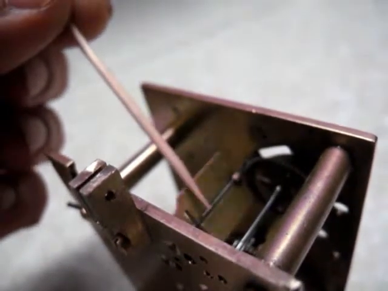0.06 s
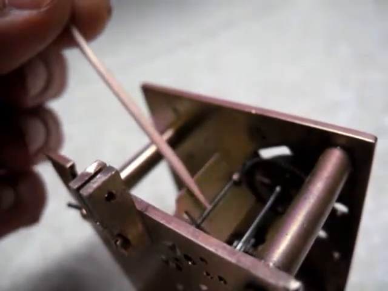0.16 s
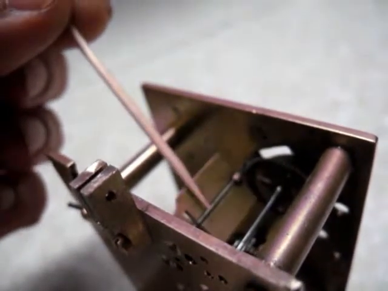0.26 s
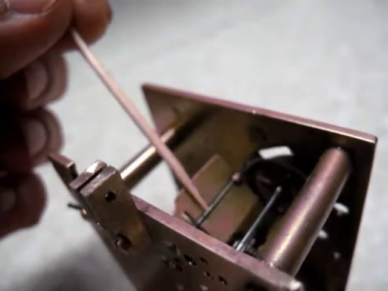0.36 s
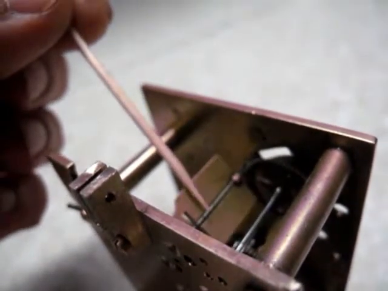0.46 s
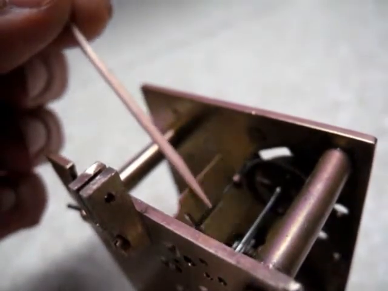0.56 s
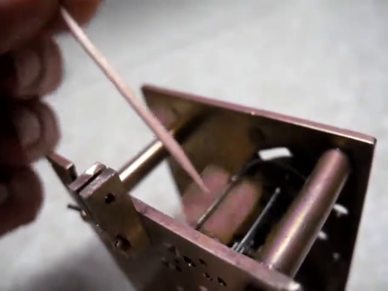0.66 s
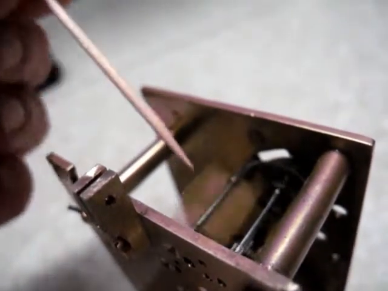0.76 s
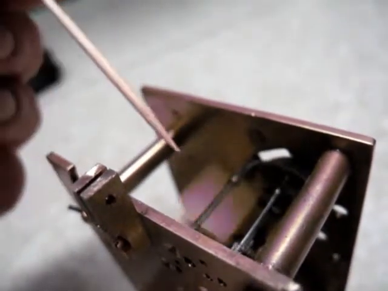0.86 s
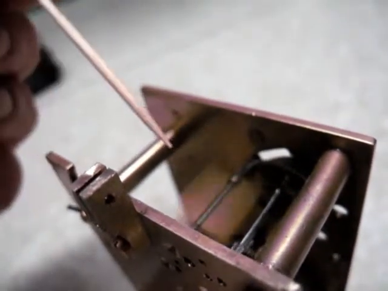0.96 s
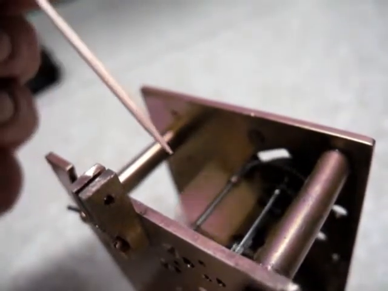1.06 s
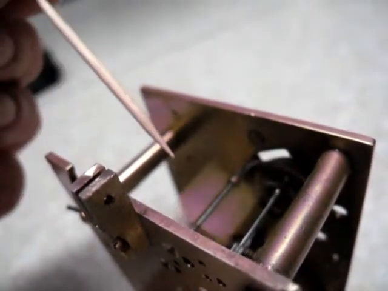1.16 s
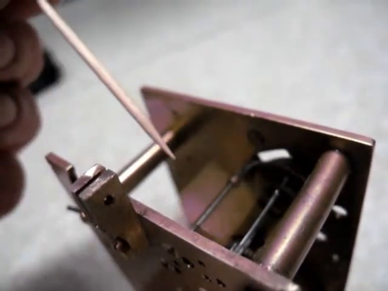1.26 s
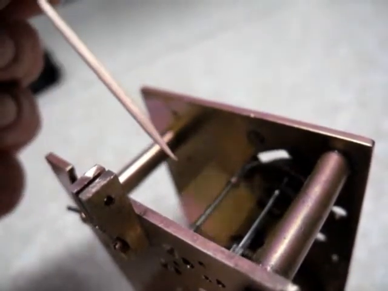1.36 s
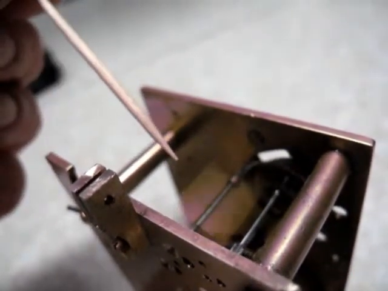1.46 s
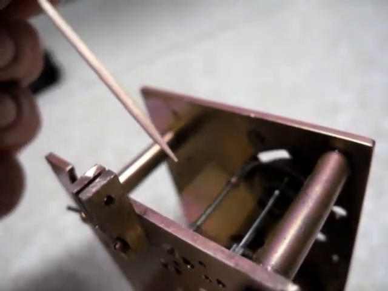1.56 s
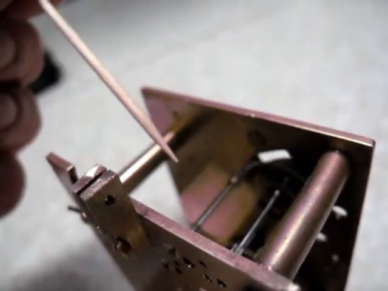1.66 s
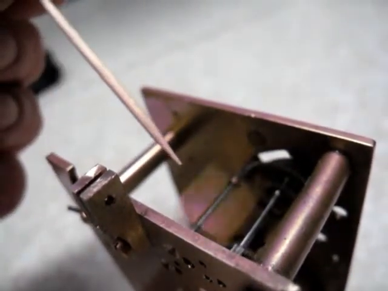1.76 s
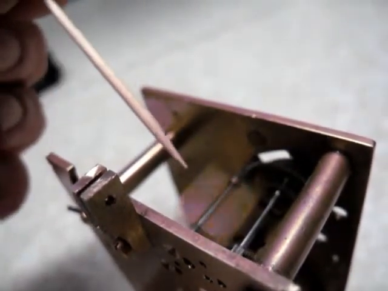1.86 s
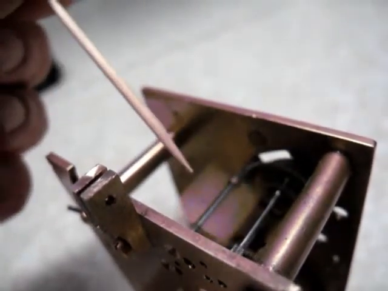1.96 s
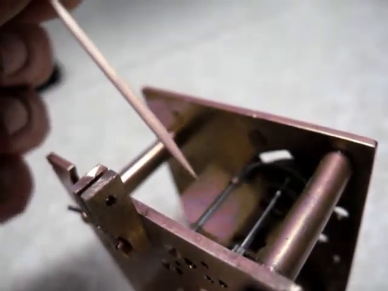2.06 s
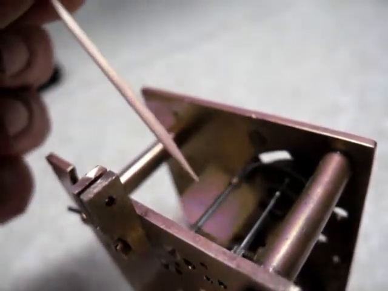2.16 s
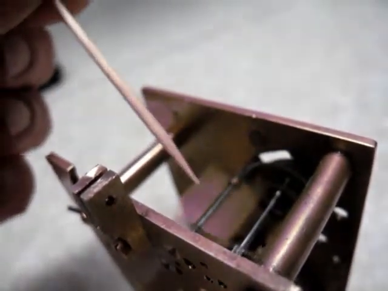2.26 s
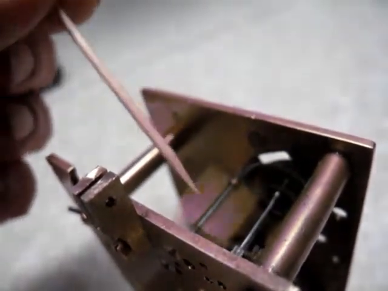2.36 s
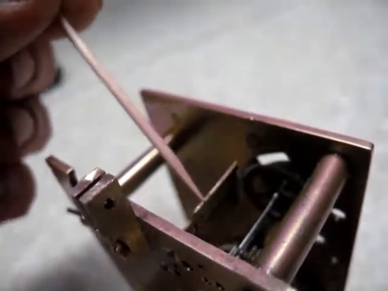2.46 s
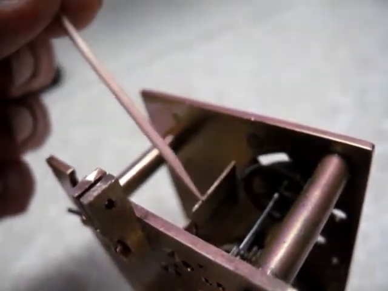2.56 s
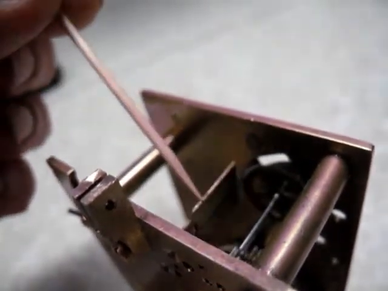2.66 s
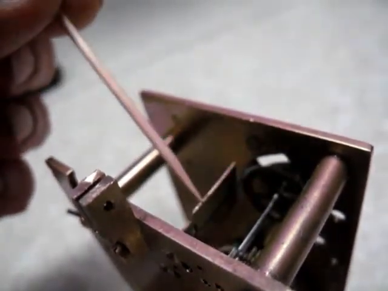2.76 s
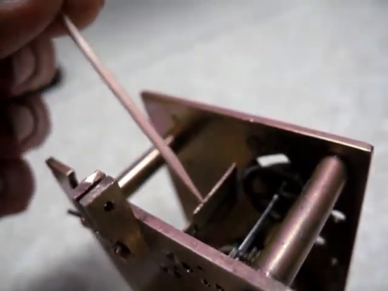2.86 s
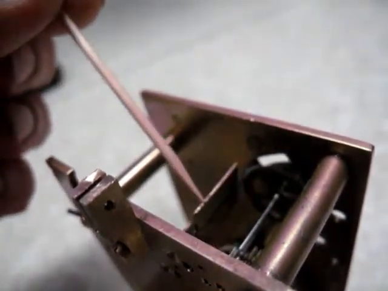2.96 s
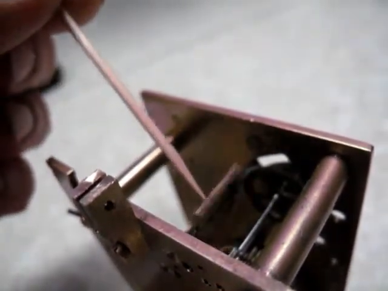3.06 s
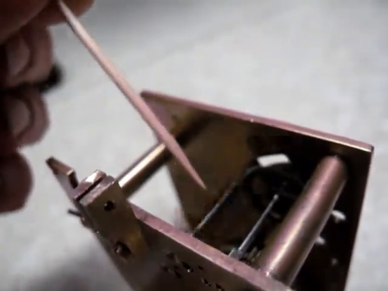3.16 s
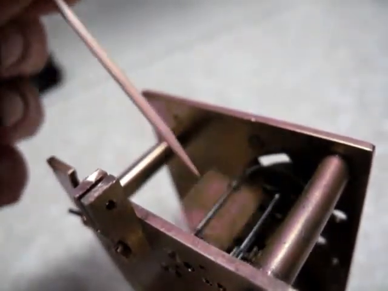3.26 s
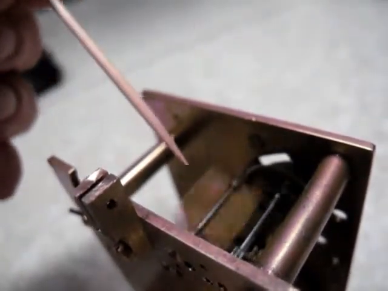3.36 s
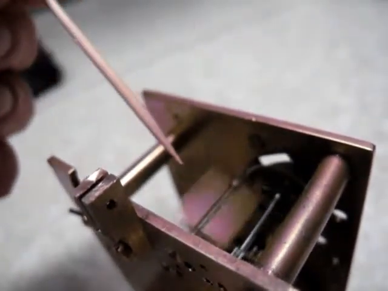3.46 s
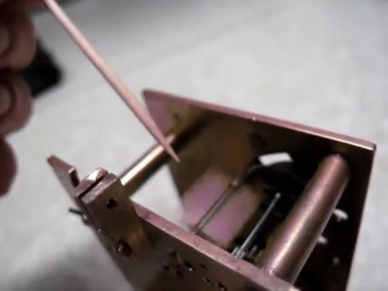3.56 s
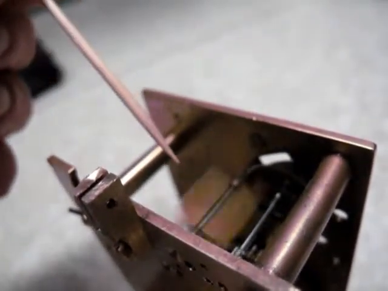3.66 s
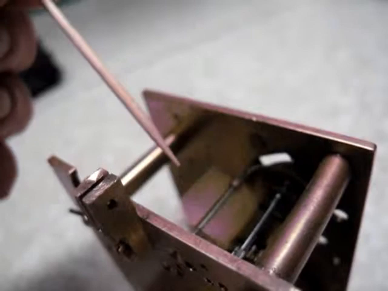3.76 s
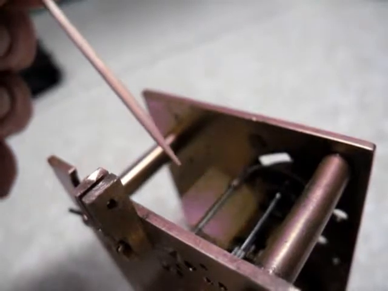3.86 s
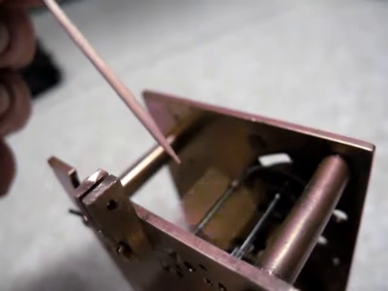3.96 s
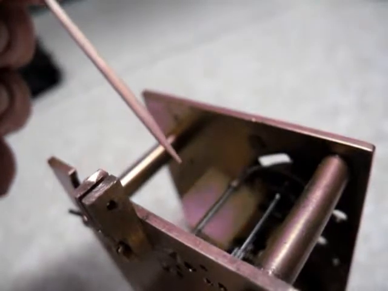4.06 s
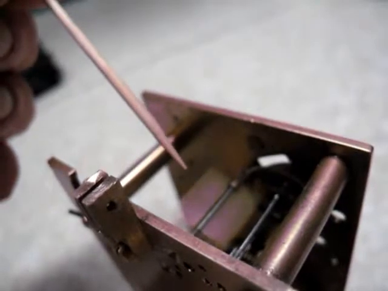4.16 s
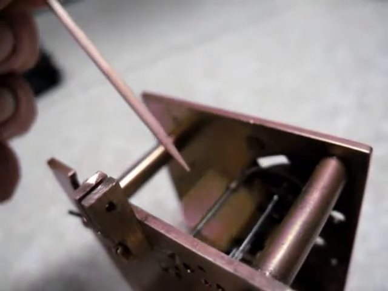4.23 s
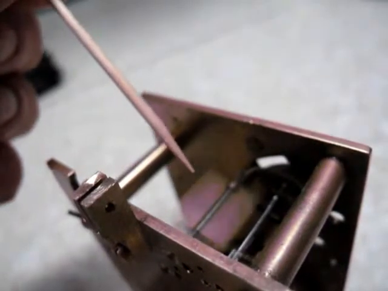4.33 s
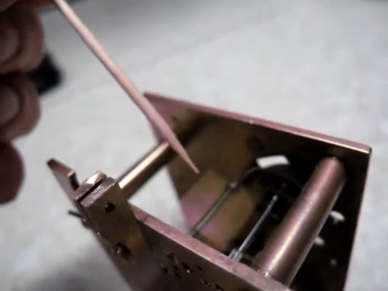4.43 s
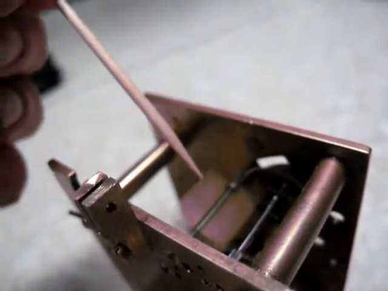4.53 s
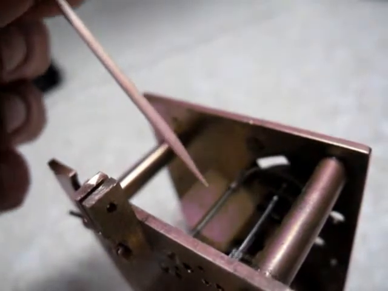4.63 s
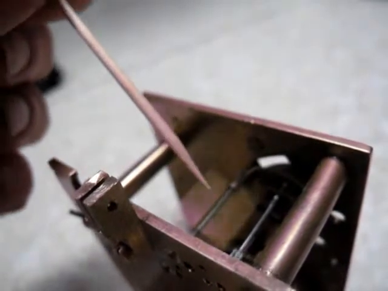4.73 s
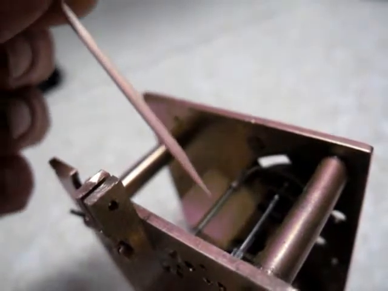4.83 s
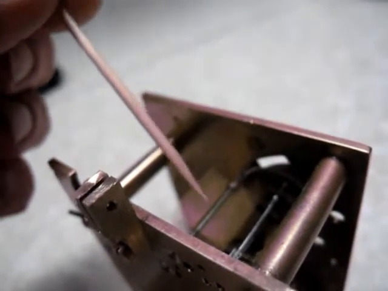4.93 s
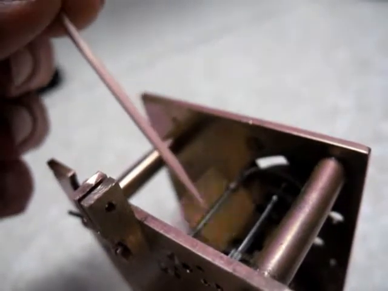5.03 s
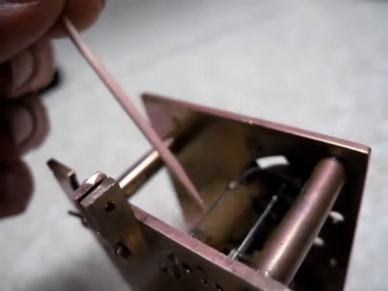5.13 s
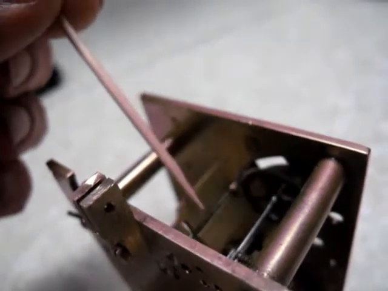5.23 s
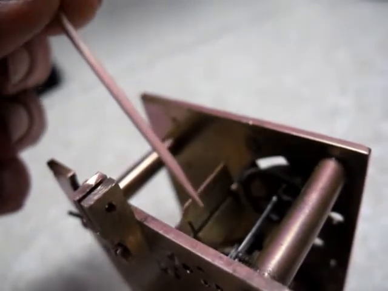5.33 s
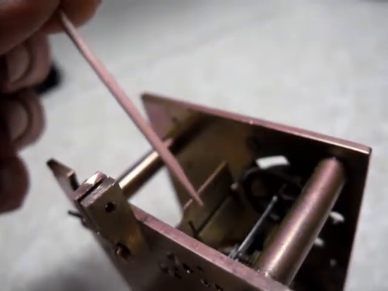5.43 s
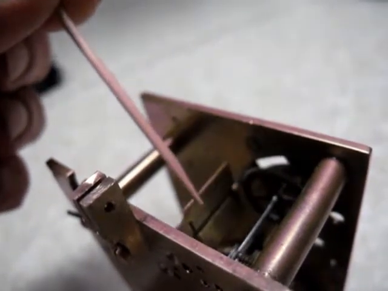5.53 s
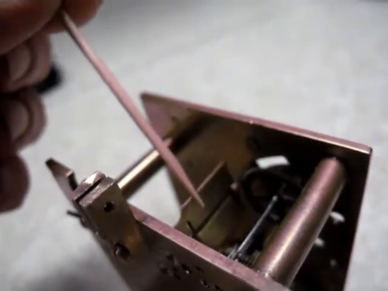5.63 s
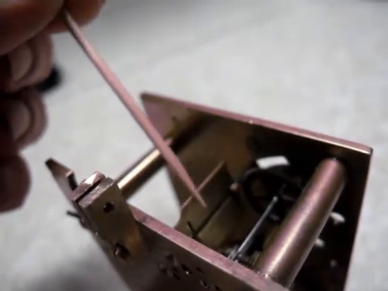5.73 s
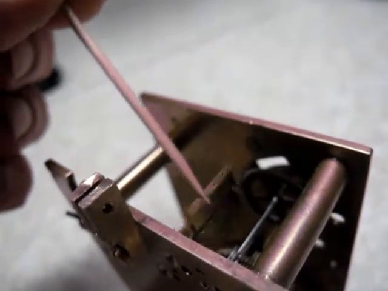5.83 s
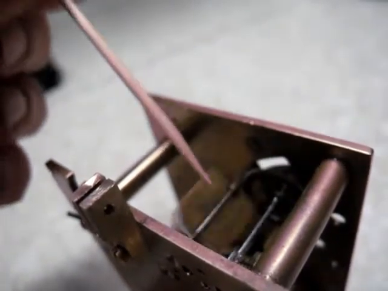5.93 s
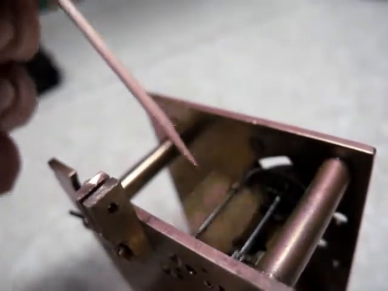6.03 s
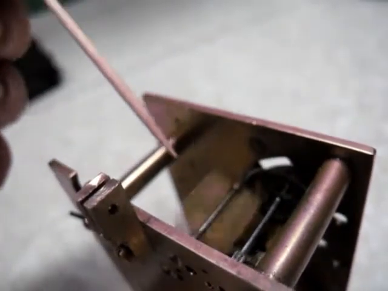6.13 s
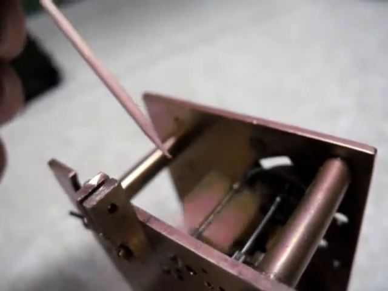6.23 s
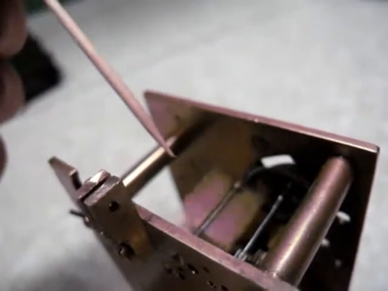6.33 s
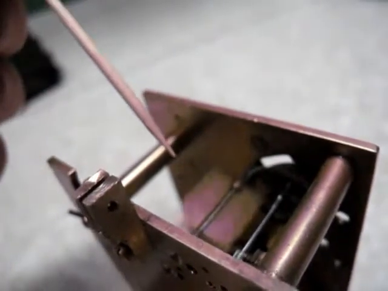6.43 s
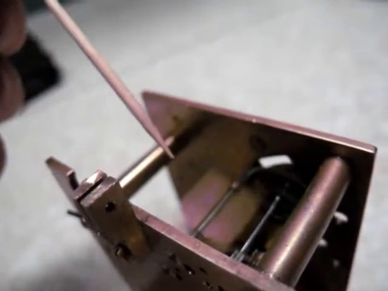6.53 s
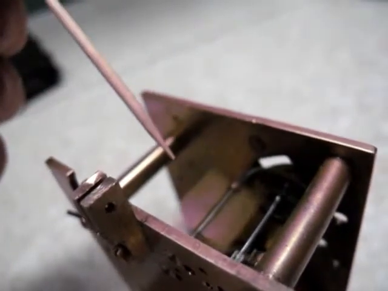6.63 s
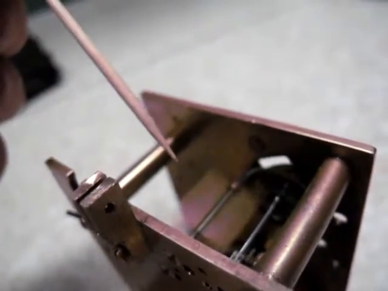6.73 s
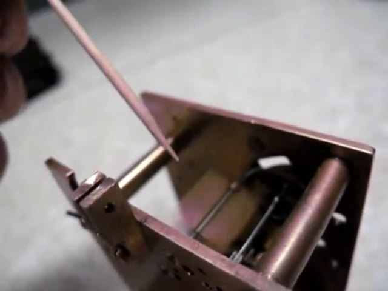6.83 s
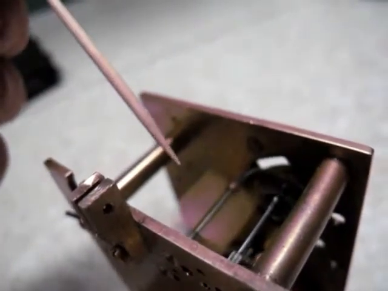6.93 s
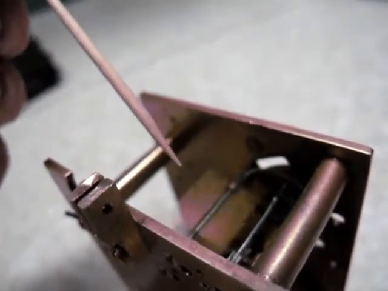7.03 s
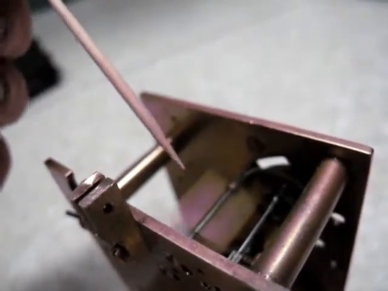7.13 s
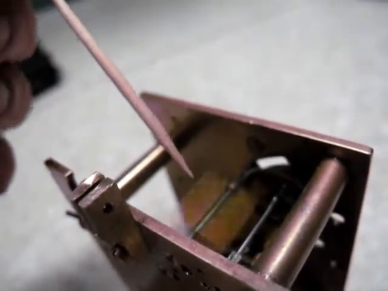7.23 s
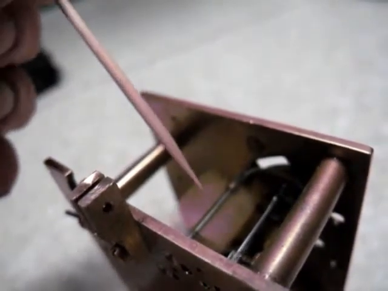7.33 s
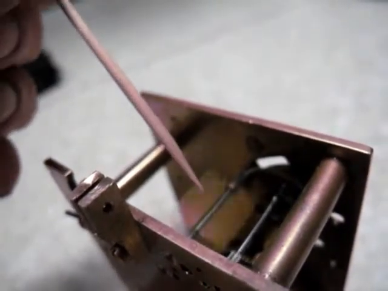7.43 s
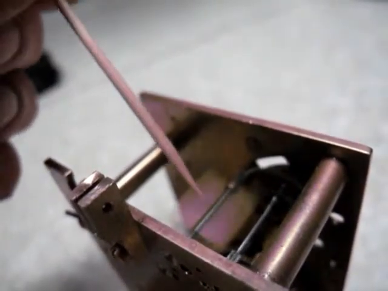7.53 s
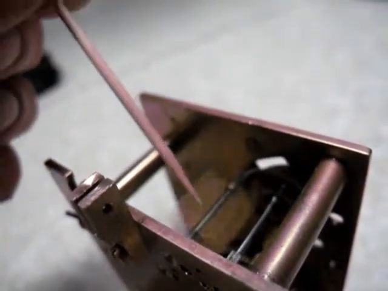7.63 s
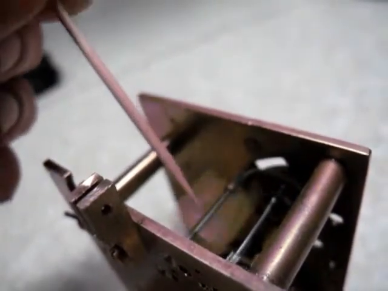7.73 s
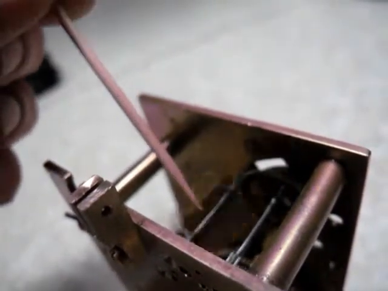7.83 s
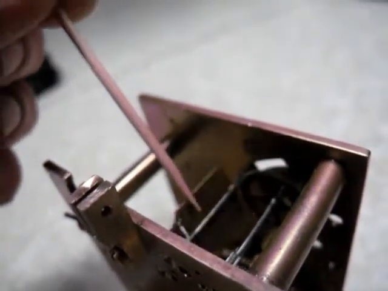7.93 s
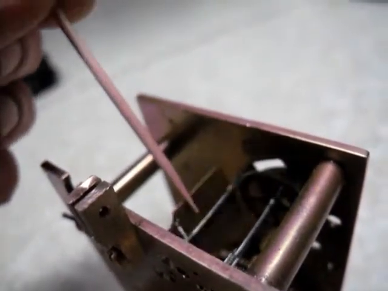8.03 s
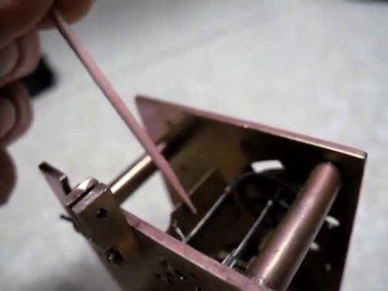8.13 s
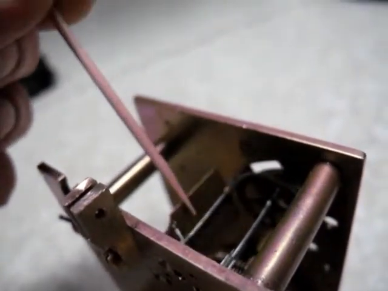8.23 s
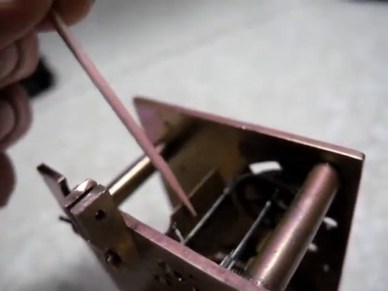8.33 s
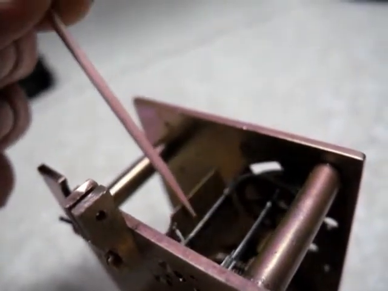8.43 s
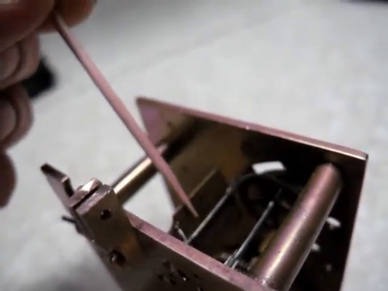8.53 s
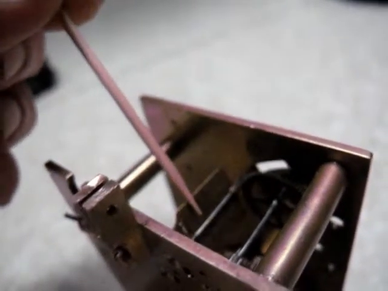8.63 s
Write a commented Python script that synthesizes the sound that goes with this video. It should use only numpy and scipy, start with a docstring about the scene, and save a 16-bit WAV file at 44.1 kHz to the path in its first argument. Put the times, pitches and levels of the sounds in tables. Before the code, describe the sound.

A small brass clock movement whirs up three times, each run stopped by a quick clicking rattle as a wooden stick catches its spinning vanes.

```python
"""Clock gear train run-downs

A brass clock movement runs down three times on a bench, heard close by. A wooden stick frees the fly, a
two-vaned air brake; teeth (ticks and grainy noise) and jumping pivots excite the resonances of frame and brass.
The lowered stick brakes the fly: the vanes slap it ever more slowly, as impulses through filters, and stop.
Filtered noise and sines give room rumble, hum, wandering tones and a steady thin electrical whine."""
import sys
import numpy as np
from scipy import signal
from scipy.fft import rfft, irfft
from scipy.io import wavfile

SR = 44100
rng = np.random.default_rng(int(sys.argv[2]) if len(sys.argv) > 2 else 0)


def unload_audio(sound):
    """Save the sound as a 16-bit wav file, at the path given as the first command line argument."""
    columns = np.transpose(np.atleast_2d(sound))
    # keep every value between -1 and 1, then stretch to whole-number steps
    steps = np.round(np.clip(columns, -1, 1) * 32767)
    wavfile.write(sys.argv[1], SR, steps.astype(np.int16))


N = 383229
TIME = np.arange(N) / SR

# Room noise spectrum: freq_hz, relative_db
ROOM_SPECTRUM = [(20, -1.5), (45, 2.5), (68, -4), (110, -3), (190, 0), (290, -4.5), (420, -8), (850, -10.5),
                 (1500, -13.5), (3000, -18), (6000, -23), (10000, -25), (11500, -32), (15500, -33.5)]
# Appliance hum: freq_hz, level_db_rms
HUM_TONES = [(47, -82.5), (95, -71), (199.2, -71.5), (231.5, -86), (299, -73), (899, -76)]
# Faint gliding tones under a Gaussian swell: middle_s, swell_sigma_s, freq_hz, glide_hz_per_s, level_db_rms
WANDERING_TONES = [(0.519, 0.25, 375, 24.5, -64.5), (.4, 0.27, 149.6, 8.4, -67.5),
                   (1.65, 0.13, 148, 3.7, -63.5), (1.951, 0.39, 99.8, 11, -63),
                   (3.6, 0.085, 114, 0.74, -66), (7.202, 0.89, 99.5, 3.6, -68)]
# Dense upper modes of the frame: freq_hz, relative_db
FRAME_SPECTRUM = [(100, -44.5), (370, -3.5), (650, -13), (1000, -7.5), (2200, -8), (2800, -2), (4000, -3),
                  (4600, -12.5), (5500, -8), (7700, -3), (10700, 0.5), (12300, -24.5), (14000, -58),
                  (15600, -12.5)]
# Ringing of the fly and its arbor: freq_hz, width_hz, relative_db
ARBOR_MODES = [(8400, 170, 3), (8980, 300, -14), (9935, 55, -8), (10500, 350, -15), (12900, 70, -23)]
# Ringing of the wheels: freq_hz, width_hz, relative_db
WHEEL_MODES = [(3239, 140, -2), (3330, 20, -4), (3320, 62, -3.5), (3770, 170, -8), (3970, 310, -11),
               (5052, 147, -6), (6060, 120, -11), (6230, 530, -19.5)]
# Slap on a vane: freq_hz, relative_db
VANE_SPECTRUM = [(120, -32), (400, -19.5), (700, -14.5), (1150, -7.5), (1550, -14.5), (2000, -3.5),
                 (2800, -10), (4000, -5.5), (5000, -7.5), (5900, 0.5), (6700, -3), (9100, 3.5),
                 (10700, -1.5), (12500, -16.5), (15600, -21)]
# Single touches of stick and vane, first graze or last creep: start_s, force_db
STICK_TOUCHES = [(0.0334, -19.5), (0.118, -31.5), (0.1515, -44), (5.049, -17), (5.2626, -27), (5.3302, -34),
                 (7.7353, -13), (8.0034, -28), (8.0645, -45)]
# Frame brushing the bench as the hand shifts: middle_s, swell_sigma_s, force_db
BENCH_BRUSHES = [(0.512, 0.035, -60), (5.507, 0.029, -66.5), (8.506, 0.02, -59.5), (8.554, 0.016, -60.5)]
# Stick frees the fly: start_s, spin_up_s, fly_drive_db, wheel_drive_db, slap_force_db
RELEASES = [(.70, .45, -37.5, -45, -11), (3.199, 0.71, -37, -43, -12), (6.00, .9, -36.5, -42.5, -11)]
# Stick meets the vanes: start_s, nominal_speed_turns_per_s, braking_s
STICK_STOPS = [(2.4601, 64.9, .0784), (5.065, 66.2, .1252), (7.7518, 57.9, .144)]
# Ringing of a wheel under slow teeth: freq_hz, width_hz, relative_db
TINKLE_MODES = [(3590, 41, 0)]
# Single jumps of an arbor in its pivot hole: start_s, force_db
ARBOR_JUMPS = [(1.408, -28.5), (1.695, -27.5), (2.078, -28.5), (2.403, -28), (3.623, -42), (3.669, -40),
               (4.258, -24.5), (4.337, -28), (4.465, -31), (4.861, -28), (4.931, -29), (5.035, -22),
               (6.693, -34), (7.011, -36), (7.402, -30), (7.576, -29), (7.670, -27)]

ROOM_DB_RMS = -57.0
WHINE_HZ, WHINE_DB_RMS = 5879.7, -61.5

# Braking: at CATCH_SHARE of full speed the stick holds a vane; the train then halts with time constant CATCH_S
CATCH_SHARE, CATCH_S = 1 / 3, .012
VANE_SKEW_TURNS = .025  # lateness of the second vane
SLAP_SPEED_POWER, SLAP_SPREAD_DB = .45, .6  # slow vanes slap more softly
REBOUND_MAX_SHARE = .55

PINION_LEAVES = 6
FLY_SPEED_POWER, WHEEL_SPEED_POWER = 1.92, 1.56  # chatter against speed, spinning up
BRAKED_POWER = 0.41  # chatter against falling speed: slaps keep the train shaking
TINKLE_DRIVE_DB, TINKLE_PACE = -66, 0.25  # drive, and share of full speed where it is clearest

# Chance jumps, weakened at low speed
JUMPS_PER_S, JUMP_FORCE_DB, JUMP_SPREAD_DB, JUMP_SPEED_POWER = 18, -32.0, 1.0, 1.4
JUMP_RISE_S, JUMP_FALL_S = 0.00024, 0.0018
JUMP_LOW_CUT_HZ = 2200  # tiny contacts carry little bass

CUTOFF_HZ = 15800


def from_db(db):
    """Decibels to gain."""
    return 10 ** (np.asarray(db) / 20)


def rms_one(x):
    """Scale to rms 1."""
    return x / np.sqrt(np.mean(x ** 2) + 1e-20)


def drift(rate_hz):
    """Low-passed noise of rms 1, computed every 20 samples and interpolated."""
    pole = np.exp(-40 * np.pi * rate_hz / SR)
    white = rng.standard_normal(N // 20 + 4002)
    slow = signal.lfilter([1], [1, -2 * pole, pole * pole], white)[4000:]  # skip filter start
    return np.interp(np.arange(N) / 20, np.arange(len(slow)), rms_one(slow))


def response(spectrum=(), modes=(), size=8192):
    """Minimum-phase impulse response of unit energy, from a broad spectrum or ringing modes."""
    hz = np.maximum(np.fft.rfftfreq(size, 1 / SR), 1)
    power = np.full(len(hz), 1e-7)
    if len(spectrum):
        points_hz, db = np.transpose(spectrum)
        power += from_db(np.interp(np.log(hz), np.log(points_hz), db)) ** 2
    for centre_hz, width_hz, db in modes:
        detuning = (hz ** 2 - centre_hz ** 2) / (hz * width_hz)
        power += from_db(db) ** 2 / (1 + detuning ** 2)
    # folded cepstrum makes the response causal
    cepstrum = irfft(np.log(power))
    cepstrum[0] /= 2
    impulse = irfft(np.exp(rfft(cepstrum[:size // 2], size)))
    return impulse / np.linalg.norm(impulse)


def through(x, impulse):
    """Convolve with an impulse response, cut to scene length."""
    return signal.fftconvolve(x, impulse)[:N]


def background():
    """Dull noise, phase-wavering hum, gliding tones and one steady high whine."""
    air = from_db(ROOM_DB_RMS) * through(rng.standard_normal(N), response(ROOM_SPECTRUM))
    tones = np.zeros(N)
    for hz, db in HUM_TONES:
        tones += from_db(db) * np.sin(2 * np.pi * hz * TIME + 1.14 * drift(2.8))
    for middle_s, sigma_s, hz, glide_hz_per_s, db in WANDERING_TONES:
        t = TIME - middle_s
        swell = from_db(db) * np.exp(-.5 * (t / sigma_s) ** 2)
        tones += swell * np.sin(2 * np.pi * (hz + glide_hz_per_s * t / 2) * t)
    tones += from_db(WHINE_DB_RMS) * np.sin(2 * np.pi * WHINE_HZ * TIME)
    return air + np.sqrt(2) * tones  # rms to peak


def settling(force_db, t60_s):
    """Decaying noise force: the train rattles to rest against the stick, shaking frame and arbor."""
    force = from_db(force_db - 60 * TIME / t60_s) * rng.standard_normal(N)
    frame = through(force, response(FRAME_SPECTRUM))
    arbor = through(force, response(modes=ARBOR_MODES))
    return frame + 0.76 * arbor


def brass(force, wheels_db):
    """Fly arbor and wheels ring together under one force."""
    ringing = response(modes=ARBOR_MODES) + from_db(wheels_db) * response(modes=WHEEL_MODES)
    return through(force, ringing)


def braking(turns_per_s, braking_s, t):
    """Fly speed t seconds after the stick bites: linear fall until a vane is caught, then a fast halt."""
    slowed = 1 - (1 - CATCH_SHARE) * np.clip(t / braking_s, 0, 1)
    return turns_per_s * slowed * np.exp(-np.maximum(t - braking_s, 0) / CATCH_S)


def vane_blows():
    """While the fly is braked a vane meets the stick every half turn: rows of start_s, force_db."""
    blows = []
    for (*_, slap_db), (bite_s, full_speed, braking_s) in zip(RELEASES, STICK_STOPS):
        t = TIME[TIME < braking_s]
        speed = braking(full_speed, braking_s, t)
        turns = np.cumsum(speed) / SR
        vane = np.arange(int(2 * turns[-1]) + 1)
        blow_turns = vane / 2 + VANE_SKEW_TURNS * (vane % 2)
        when_s = np.interp(blow_turns, turns, t)
        share = np.interp(when_s, t, speed) / full_speed
        spread_db = SLAP_SPREAD_DB * rng.standard_normal(len(vane))
        db = slap_db + SLAP_SPEED_POWER * 20 * np.log10(share) + spread_db
        blows += zip(bite_s + when_s, db)
    return blows


def slaps(crack_db, ring_db, buzz_db):
    """A vane cracks on the stick, rebounds within 0.2-0.8 ms, buzzes on its arbor and rings the brass."""
    force = np.zeros(N)
    blows = list(STICK_TOUCHES) + vane_blows()
    for (start_s, db), (delay, share) in zip(blows, rng.random((len(blows), 2))):
        rebound_s = start_s + .0002 + .0006 * delay
        force[round(start_s * SR)] += from_db(db)
        force[round(rebound_s * SR)] += from_db(db) * REBOUND_MAX_SHARE * share
    buzz_decay = np.exp(-TIME[:SR // 20] / .0011)
    buzz = through(force, buzz_decay) * rng.standard_normal(N)
    crack = through(from_db(crack_db) * force + from_db(buzz_db) * buzz, response(VANE_SPECTRUM))
    return crack + from_db(ring_db) * brass(force, wheels_db=-4.5)


def brushes(grain_db, ring_db):
    """Soft, grainy friction under the frame, faintly ringing the wheels."""
    swell = np.zeros(N)
    for middle_s, sigma_s, db in BENCH_BRUSHES:
        swell += from_db(db) * np.exp(-.5 * ((TIME - middle_s) / sigma_s) ** 2)
    friction = rng.standard_normal(N) * from_db(grain_db * drift(120))
    force = swell * rms_one(friction)
    wheels = through(force, response(modes=WHEEL_MODES))
    return through(force, response(FRAME_SPECTRUM)) + from_db(ring_db) * wheels


def motion():
    """Exponential spin-up, then braking: fly speed (turns/s), pace (speed share), fly and wheel drive."""
    speed, pace, at_fly, at_wheels = np.zeros((4, N))
    for release, stop in zip(RELEASES, STICK_STOPS):
        release_s, spin_up_s, fly_db, wheel_db, _ = release
        bite_s, full_speed, braking_s = stop
        running_s = np.clip(TIME - release_s, 0, bite_s - release_s)
        gathered = 1 - np.exp(-running_s / spin_up_s)
        gathered = gathered / gathered.max()
        braked = braking(0.99, braking_s, TIME - bite_s)  # tops out at 0.99 of nominal
        speed += full_speed * gathered * braked
        pace += gathered * braked
        at_fly += from_db(fly_db) * gathered ** FLY_SPEED_POWER * braked ** BRAKED_POWER
        at_wheels += from_db(wheel_db) * gathered ** WHEEL_SPEED_POWER * braked ** BRAKED_POWER
    return speed, pace, at_fly, at_wheels


def flutter(rate_hz, depth_db):
    """Random gain of a loose pivot, held within twice depth_db by the play in its hole."""
    return from_db(depth_db * 2 * np.tanh(drift(rate_hz) / 2))


def mesh(turns, uneven_db, slide, grain_db):
    """Tooth force: pinion leaves drop in with uneven, jittered ticks, then slide grainily."""
    leaf = np.floor(PINION_LEAVES * turns + .15 * drift(150))
    sizes = from_db(uneven_db * (2 * rng.random(N) - 1)) * np.sign(rng.standard_normal(N))
    ticks = (np.diff(leaf, prepend=0) > 0) * sizes
    rubbing = rng.standard_normal(N) * from_db(grain_db * drift(205))
    return (rms_one(ticks) + slide * rms_one(rubbing)) / np.hypot(1, slide)


def train(frame_db, arbor_db, wheels_db, gear_tone_db, wobble_db):
    """Teeth and pivots shake the frame and ring the brass; the pinion adds a faint tone at leaf rate."""
    speed, pace, at_fly, at_wheels = motion()
    turns = np.cumsum(speed) / SR
    # load swings as each vane passes the plate, and with play in the train
    load = from_db(wobble_db * np.cos(4 * np.pi * turns))
    load = load * flutter(rate_hz=170, depth_db=2.2) * flutter(rate_hz=27, depth_db=0.94)
    at_fly, at_wheels = load * at_fly, load * at_wheels
    # faster teeth slide more and hit the frame slightly harder
    teeth = [mesh(turns, uneven_db=5.0, slide=2.2 * pace, grain_db=2.2) for _ in range(3)]
    hardness_db = 0.37 * (pace - 1)
    frame = through(teeth[0] * at_fly * from_db(frame_db + hardness_db), response(FRAME_SPECTRUM))
    arbor_force = teeth[1] * at_fly * flutter(rate_hz=110, depth_db=3.0)
    arbor = through(arbor_force, response(modes=ARBOR_MODES))
    wheel_force = teeth[2] * at_wheels * flutter(rate_hz=110, depth_db=2.5)
    wheels = through(wheel_force, response(modes=WHEEL_MODES))
    # slow teeth tinkle one by one
    slow = pace / TINKLE_PACE * np.exp(1 - pace / TINKLE_PACE)
    ticks = mesh(turns, uneven_db=4.0, slide=.2, grain_db=2.0)
    tinkle = through(ticks * slow * from_db(TINKLE_DRIVE_DB), response(modes=TINKLE_MODES))
    leaf_phase = 2 * np.pi * PINION_LEAVES * turns + 0.76 * drift(16)
    tone = at_fly * np.sin(leaf_phase) * from_db(gear_tone_db + 1.0 * drift(23))
    return frame + from_db(arbor_db) * arbor + from_db(wheels_db) * wheels + tinkle + tone


def jumps(frame_db, brass_db):
    """A jumping arbor makes a burst of tiny contacts, a few ms long, jolting frame and brass."""
    _, pace, _, _ = motion()
    by_chance = rng.random(N) < JUMPS_PER_S / SR
    chance_db = JUMP_FORCE_DB + JUMP_SPREAD_DB * rng.standard_normal(N)
    jolts = by_chance * pace ** JUMP_SPEED_POWER * from_db(chance_db)
    for start_s, db in ARBOR_JUMPS:
        jolts[round(start_s * SR)] += from_db(db)
    t = TIME[:SR // 25]
    shape = (1 - np.exp(-t / JUMP_RISE_S)) * np.exp(-t / JUMP_FALL_S)
    force = through(jolts, shape / shape.max()) * rng.standard_normal(N)
    force = signal.lfilter(*signal.butter(1, JUMP_LOW_CUT_HZ, "high", fs=SR), force)
    frame = through(force, response(FRAME_SPECTRUM))
    return from_db(frame_db) * frame + from_db(brass_db) * brass(force, wheels_db=3.0)


def tail(t60_s, rise_s):
    """Diffuse reflections of unit energy: noise that builds up and dies away."""
    t = TIME[:SR // 2]
    echoes = rng.standard_normal(len(t)) * from_db(-60 * t / t60_s) * (1 - np.exp(-t / rise_s))
    return echoes / np.linalg.norm(echoes)


def scene():
    """The movement on the bench in a small, dry room."""
    clock = settling(force_db=-35.0, t60_s=0.086)
    clock = clock + slaps(crack_db=4.0, ring_db=-5.5, buzz_db=-9.5)
    clock = clock + brushes(grain_db=2.5, ring_db=-7.5)
    clock = clock + train(frame_db=-5.5, arbor_db=-3.0, wheels_db=-1.04, gear_tone_db=-29.5, wobble_db=2.0)
    clock = clock + jumps(frame_db=-5.5, brass_db=-5.5)
    room = from_db(-14.0) * through(clock, tail(t60_s=.15, rise_s=.004))
    return (clock + room + background())[None]


def record(dry):
    """Microphone with a deep treble notch, then a steep elliptic low-pass."""
    notch_hz, notch_q = 11850, 9.0
    coloured = signal.lfilter(*signal.iirnotch(notch_hz, notch_q, fs=SR), dry)
    low_pass = signal.ellip(10, .2, 70, CUTOFF_HZ, fs=SR, output="sos")
    return signal.sosfilt(low_pass, coloured)


dry = scene()
out = record(dry)
unload_audio(out)
```